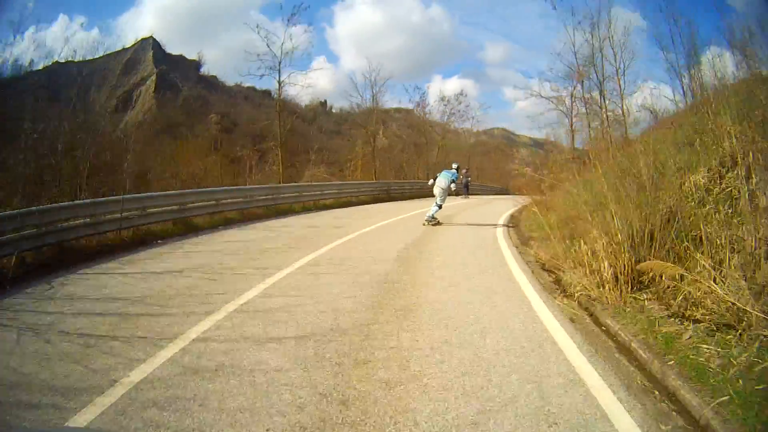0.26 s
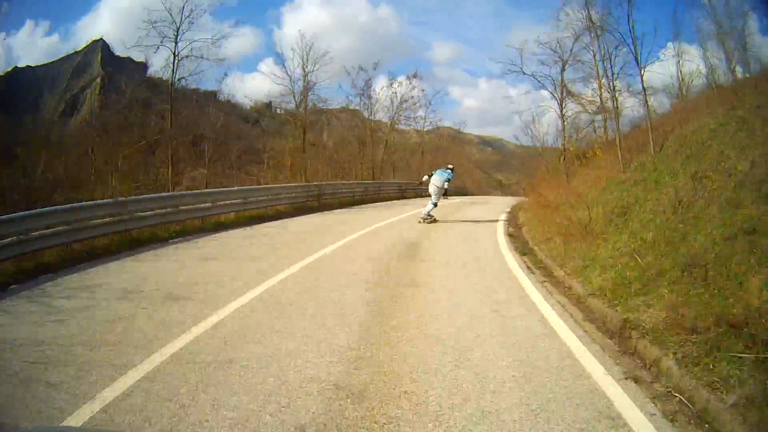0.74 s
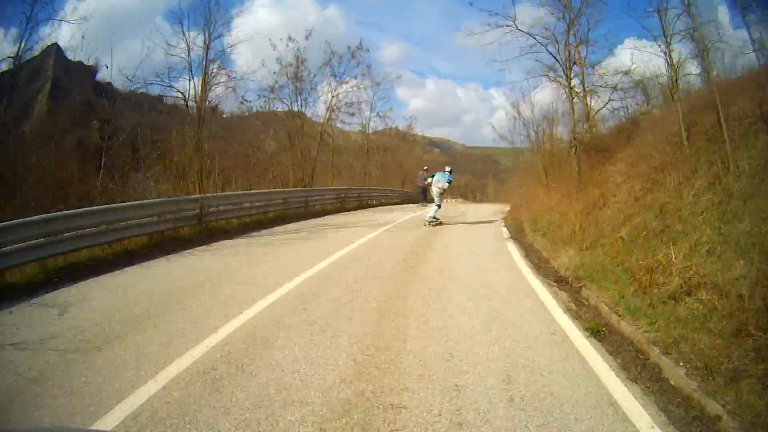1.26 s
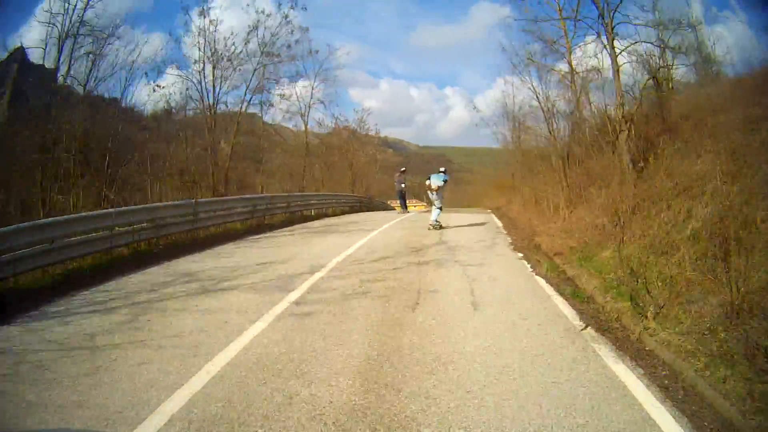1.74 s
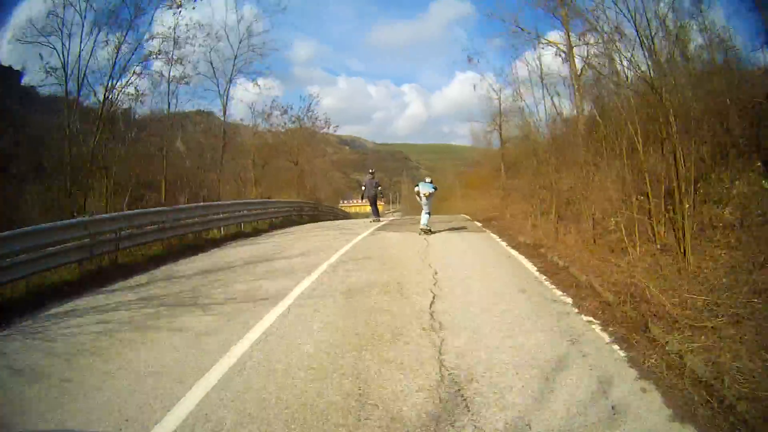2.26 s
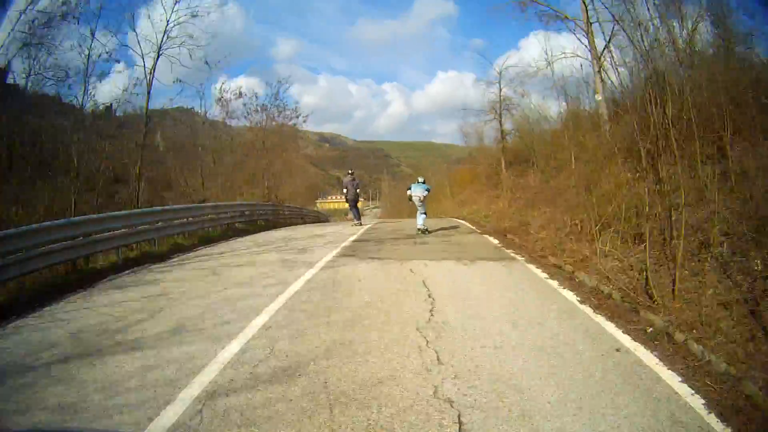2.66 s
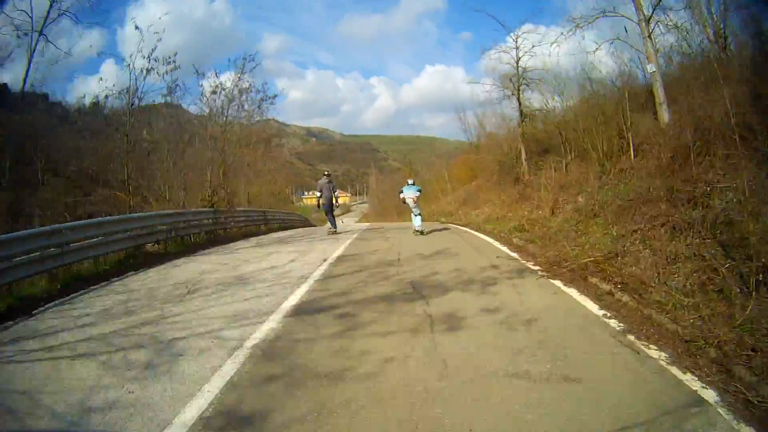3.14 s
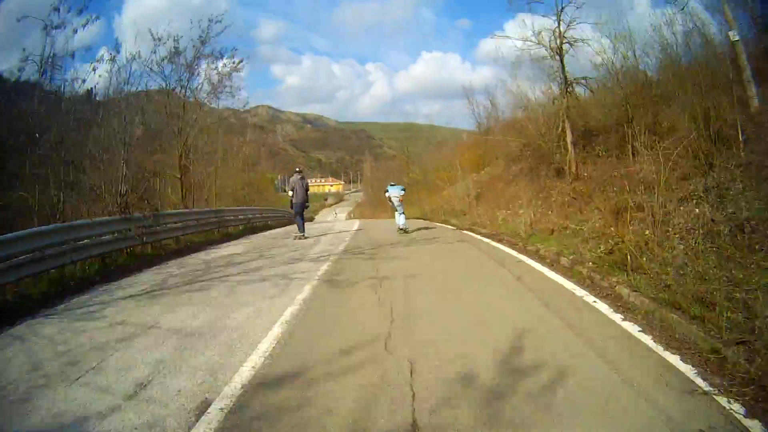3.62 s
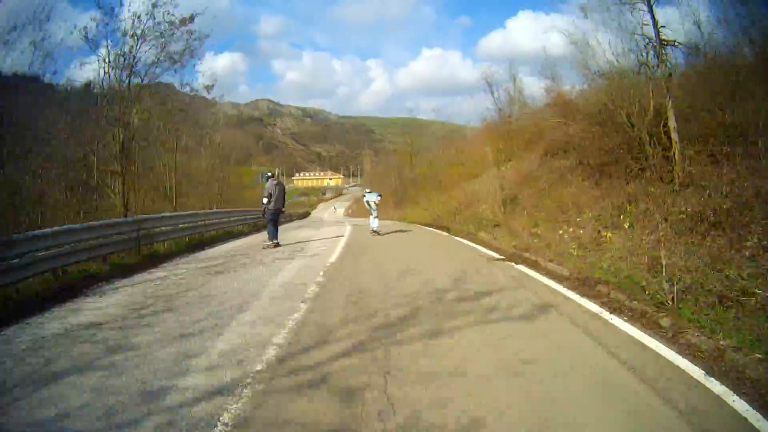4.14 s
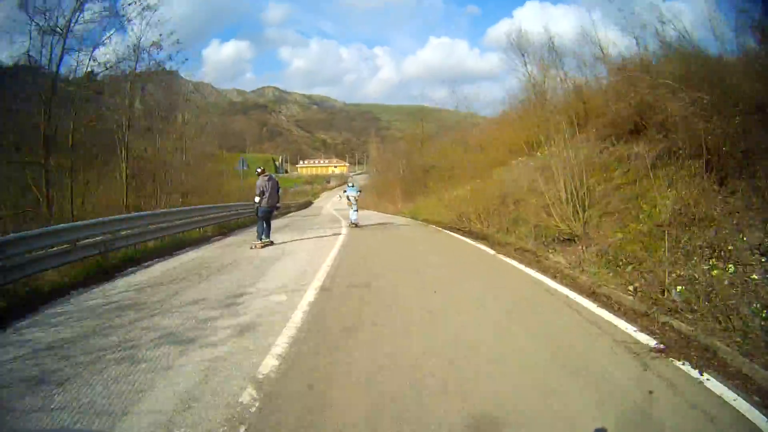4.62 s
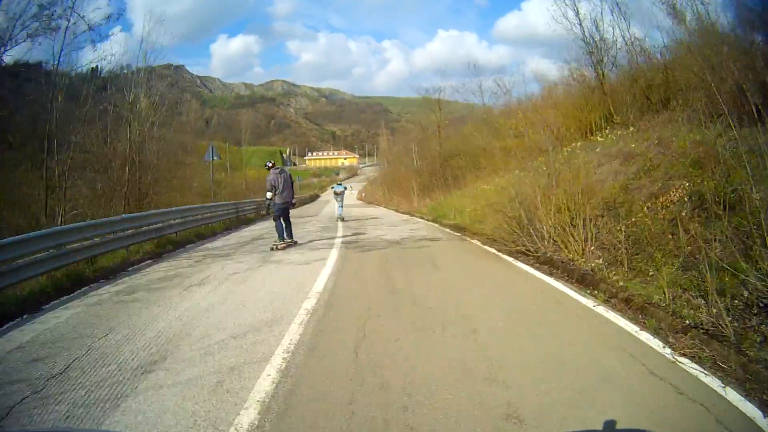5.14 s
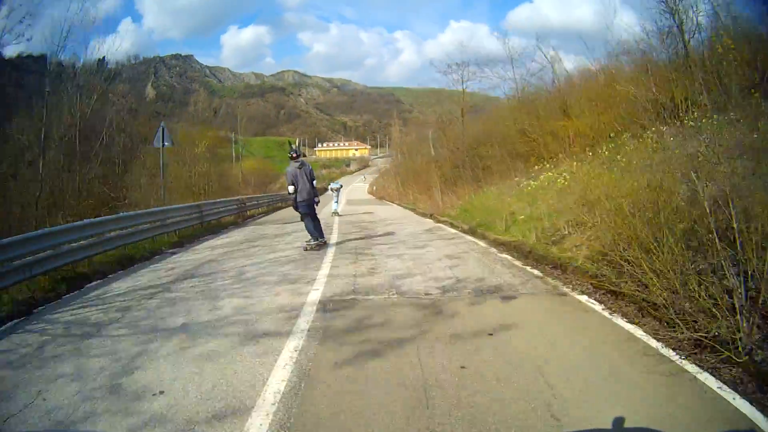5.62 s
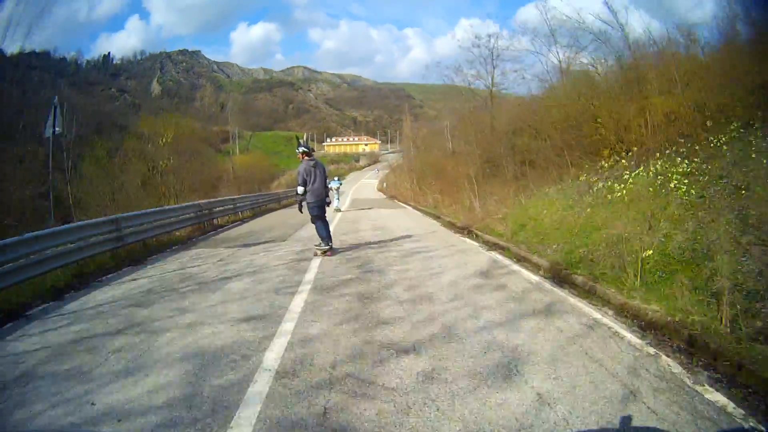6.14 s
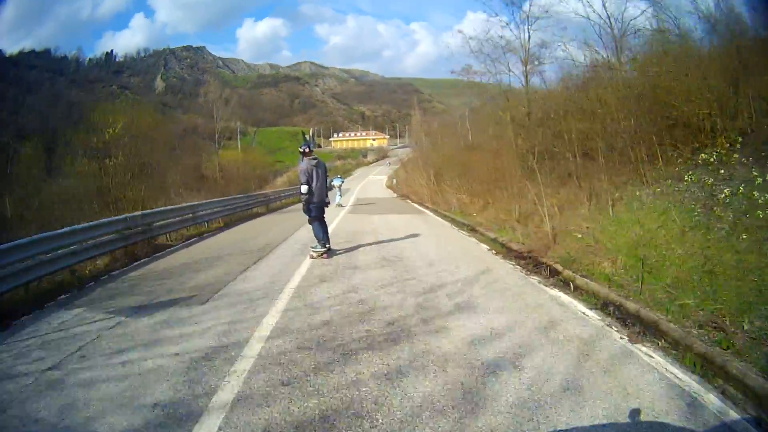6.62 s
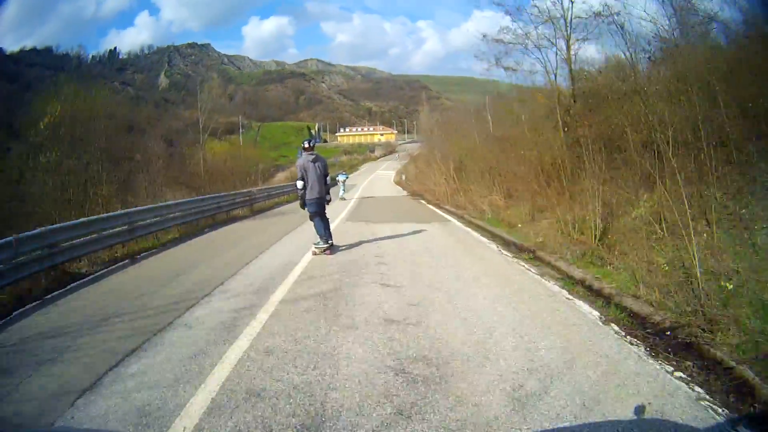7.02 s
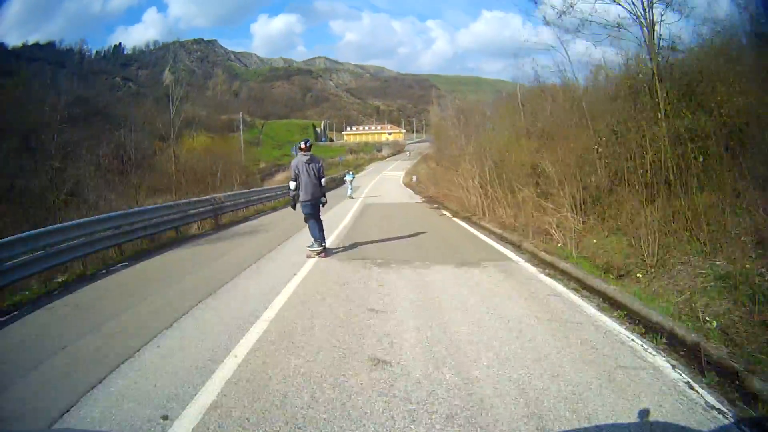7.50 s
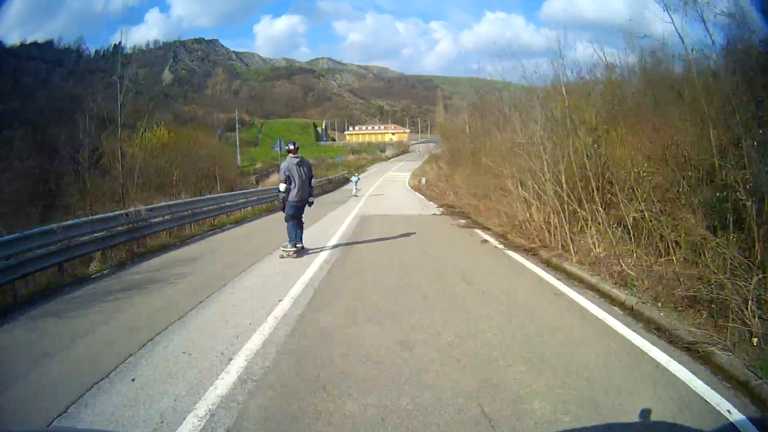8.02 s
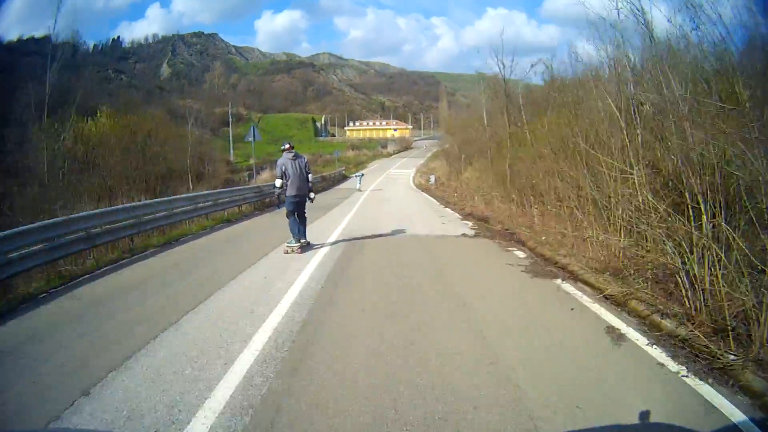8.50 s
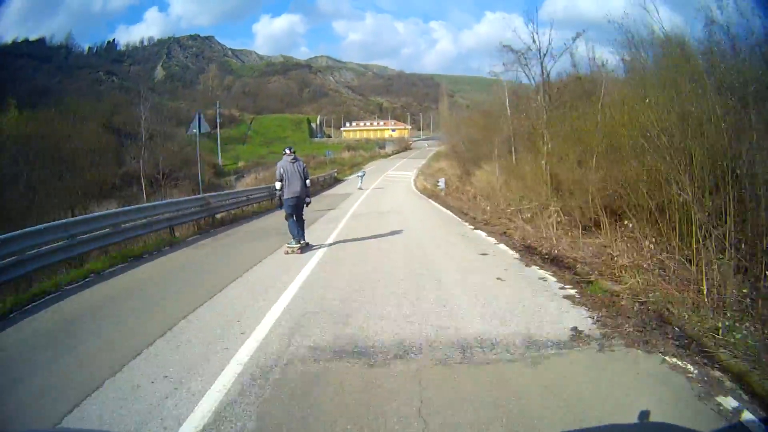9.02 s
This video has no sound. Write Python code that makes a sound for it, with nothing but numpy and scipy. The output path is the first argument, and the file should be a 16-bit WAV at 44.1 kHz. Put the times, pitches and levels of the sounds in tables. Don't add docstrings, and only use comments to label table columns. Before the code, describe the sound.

A continuous low rumble of a longboard speeding downhill, with buzzing body vibration, gritty rattle, dull crack thumps and a few small stone knocks.

```python
import sys
import numpy as np
from scipy import signal
from scipy.fft import rfft, irfft, next_fast_len
from scipy.io import wavfile
from scipy.ndimage import uniform_filter1d, map_coordinates

SR = 44100
rng = np.random.default_rng(int(sys.argv[2]) if len(sys.argv) > 2 else 0)


def to_wav(s):
    ch = np.atleast_2d(s).T
    pcm = np.round(np.clip(ch, -1, 1) * 32767)
    wavfile.write(sys.argv[1], SR, pcm.astype(np.int16))


def voltage_ratio(decibels):
    exponent = np.asarray(decibels, float) / 20
    return 10 ** exponent


N = 408366
HIT_S = np.arange(SR // 5) / SR


def unit(x):
    return x / np.sqrt(np.mean(x ** 2) + 1e-20)


def along(points, hz):
    f, v = np.transpose(points)
    return np.interp(np.log(hz + 1), np.log(f + 1), v)


def wobble(knots_per_s):
    return map_coordinates(rng.standard_normal(N // 100), [np.arange(N) * knots_per_s / SR])


def filtered(x, response):
    m = next_fast_len(N + SR // 2)
    return irfft(rfft(x, m) * response(np.fft.rfftfreq(m, 1 / SR)), m)[..., :N]


def ring(x, modes):
    def response(f):
        total = 0
        for k, (hz, width_hz, db) in enumerate(modes):
            damping = 1j * f * width_hz
            total = total + (-1) ** k * voltage_ratio(db) * damping / (hz * hz - f * f + damping)
        return total
    return filtered(x, response)


def evened(x, size):
    power = np.abs(signal.hilbert(x, next_fast_len(N))[:N]) ** 2
    swell = np.abs(uniform_filter1d(power, size))
    return unit(x / np.sqrt(swell + 1e-3 * power.mean()))


def hits(times_s, shapes):
    out = np.zeros(N + SR)
    for s, shape in zip(times_s, shapes):
        out[round(s * SR):][:len(shape)] += shape
    return out[:N]


def passing(rows, edge=2):
    t = np.arange(0, N + 64, 64) / SR
    change_db = sum(db * np.exp(-np.abs((t - s) / half_s) ** edge) for s, db, half_s in rows)
    return np.interp(np.arange(N) / SR, t, change_db)


# [t/s, unevenness/dB, stone coarseness/dB]
SURFACE = [(0.0, -36, -51), (0.5, -38, -52.5), (0.85, -37.5, -49.5), (1.3, -42, -50), (1.9, -38.5, -51),
           (2.3, -41.5, -54), (2.6, -42.5, -55.5), (3.1, -42.5, -56.4), (3.5, -42, -54.5),
           (3.95, -47.5, -60.5), (4.25, -50.5, -52), (4.6, -49, -55.5), (5.2, -41.5, -56.5),
           (5.6, -45.5, -54.5), (6.4, -40, -55.8), (7.5, -39.5, -54.5), (8.5, -40, -54), (9.26, -47, -57)]


def surface():
    s, uneven_db, coarse_db = np.transpose(SURFACE)
    t = np.arange(N) / SR
    return np.interp(t, s, uneven_db), np.interp(t, s, coarse_db)


def answer(usual_db, per_uneven, per_coarse):
    uneven_db, coarse_db = surface()
    return usual_db + per_uneven * (uneven_db + 43) + per_coarse * (coarse_db + 54)


# [f/Hz, width/Hz, level/dB]
DECK_MODES = [(21.9, 23, -32.5), (44.4, 10.3, -9.5), (54.8, 4.32, 1)]
# [t/s, change/dB, half length/s]
DIPS = [(0.205, 6, 0.04), (0.545, -7.0, 0.13), (0.845, 3, 0.1), (1.095, -10, 0.045), (1.595, 2.0, 0.25),
        (1.875, -11, 0.045), (2.035, 6, 0.063), (2.345, 3.8, 0.063), (2.635, -6, 0.1), (2.965, 5, 0.034),
        (3.515, 5.5, 0.054), (3.785, 6.6, 0.11), (4.295, 4.2, 0.063), (4.625, 0, 0.1), (4.925, -6, 0.07),
        (5.115, 3.5, 0.045), (5.545, -10, 0.078), (6.205, -2.5, 0.21), (6.685, -9, 0.14),
        (6.895, 7.5, 0.034), (7.145, 4.5, 0.07), (7.805, -11, 0.055), (8.005, 3.5, 0.07), (8.165, -7, 0.07),
        (8.365, 5.5, 0.034), (8.465, 2, 0.026), (8.685, 7.5, 0.11), (8.915, 3, 0.07)]


def deck():
    level_db = answer(-47.5, per_uneven=0.49, per_coarse=0.06) + 1.28 * passing(DIPS) + 0.5
    return voltage_ratio(level_db) * evened(ring(rng.standard_normal(N), DECK_MODES), size=3000)


# [f/Hz, width/Hz, level/dB]
AXLE_MODES = [(86.9, 22, -2), (116, 30.1, 2.5)]
# [t/s, change/dB, half length/s]
RIDGES = [(0.395, -3.5, 0.052), (0.525, 4.9, 0.017), (0.935, -5.0, 0.062), (1.045, 4, 0.03),
          (1.335, 4, 0.035), (2.475, 2, 0.026), (2.565, -7, 0.023), (2.645, 5, 0.03), (2.795, -4, 0.056),
          (2.905, 3, 0.019), (3.465, -1, 0.03), (3.545, -5, 0.022), (3.995, -3, 0.046), (4.115, 4, 0.049),
          (4.435, -3.5, 0.036), (4.575, 3.5, 0.05), (4.965, 6.5, 0.015), (5.465, -6, 0.03),
          (5.615, -4.4, 0.042), (5.835, 0.5, 0.21), (6.185, -2.5, 0.057), (6.355, 3.8, 0.02),
          (6.695, -5, 0.024), (7.815, -6, 0.024), (8.395, 6.5, 0.023), (8.505, -5, 0.027),
          (8.635, 2.5, 0.017), (9.155, 2.9, 0.045)]


def axles():
    level_db = surface()[0] - 0.8 + 1.28 * passing(RIDGES)
    bounce = ring(ring(rng.standard_normal(N), AXLE_MODES), [(113, 150, 0)])
    return voltage_ratio(level_db) * evened(bounce, size=3000)


# [f/Hz, width/Hz, level/dB]
CORE_MODES = [(216.4, 24, -8.5), (246.9, 6.3, -1.5), (260.8, 7.4, -6.5)]
# [t/s, change/dB, half length/s]
LEANS = [(0.195, 7.2, 0.18), (0.505, 0.5, 0.1), (0.805, -6, 0.1), (2.895, 8.5, 0.11), (3.345, 6.5, 0.058),
         (3.575, -8.0, 0.12), (3.965, 8.5, 0.09), (4.445, -1, 0.17), (4.845, 4.5, 0.07),
         (5.065, -19, 0.092), (5.665, 5, 0.1), (5.975, 5.5, 0.061), (6.985, -1, 0.045), (8.195, -6, 0.31),
         (8.595, -4, 0.15), (9.035, 5.5, 0.21)]


def wheel_cores():
    level_db = answer(-60.5, per_uneven=0.82, per_coarse=1)
    level_db = level_db + 0.15 * passing(RIDGES) + 0.92 * passing(LEANS) + 1.8 * wobble(9)
    drum = ring(ring(rng.standard_normal(N), CORE_MODES), [(242, 120, 0)])
    return voltage_ratio(level_db) * evened(drum, size=5000)


# [f/Hz, width/Hz, level/dB]
PANEL_MODES = [(302.5, 19.4, 0), (316.3, 20, 0.5), (357.2, 6.4, 1), (382.6, 15.3, -2), (489.3, 33, -3),
               (528, 23.5, -2.5), (587, 44, -1.5), (706, 81, -14)]
# [t/s, change/dB, half length/s]
PATCHES = [(0.235, -2, 0.023), (0.345, 3.5, 0.043), (0.565, 2, 0.036), (0.665, -3.2, 0.022),
           (0.805, -3.5, 0.053), (0.945, 2.5, 0.049), (1.045, 1.3, 0.029), (1.185, 2, 0.074),
           (1.335, -2.5, 0.059), (1.585, -1.5, 0.14), (1.775, 1.5, 0.1), (2.115, 2, 0.16),
           (2.435, 3, 0.015), (2.585, -2, 0.028), (2.695, 2.3, 0.025), (2.815, 2.5, 0.066),
           (3.035, -1.5, 0.13), (3.205, 2, 0.037), (4.025, 2.2, 0.035), (4.445, -1.8, 0.07),
           (5.985, 2.5, 0.03), (6.855, 1.5, 0.07), (7.055, -2.5, 0.039), (7.175, -2, 0.19),
           (7.515, 1.5, 0.085), (8.335, 0.6, 0.1), (8.525, -2.6, 0.08), (9.035, 2, 0.11)]


def panels():
    level_db = answer(-56, per_uneven=0.25, per_coarse=0.5)
    level_db = level_db + 0.17 * passing(LEANS) + 0.18 * passing(PATCHES) + 0.75 * wobble(11)
    body = ring(ring(rng.standard_normal(N), PANEL_MODES), [(476, 640, 0)])
    return voltage_ratio(level_db) * evened(body, size=4000)


# [f/Hz, width/Hz, change/dB]
MOUNT_BANDS = [(14, 10, -10), (71, 7.1, -15), (159.2, 5.5, 3), (193, 13, 2.5), (213, 9.1, -14),
               (288, 12.2, -7), (341.5, 3.7, 1), (373, 4.6, -10.5), (428, 17, -1.5), (667, 39.4, -7),
               (926, 67, -22), (1000, 35, 6)]


def rumble():
    shake = deck() + axles() + wheel_cores() + panels()

    def mount(f):
        return voltage_ratio(sum(db * np.exp(-((f - hz) / width_hz) ** 2) for hz, width_hz, db in MOUNT_BANDS))
    return filtered(shake, mount)


# [f/Hz, width/Hz, level/dB]
SHELL_MODES = [(820, 324, -13.5), (1176, 79, -8), (1473, 176, -5.5), (1735, 234, 0), (2430, 955, -3.5),
               (3164, 240, -0.5), (3645, 300, -3), (4253, 280, -1.5), (4970, 355, 5), (5330, 490, 1.5),
               (6120, 640, -3.5), (7380, 1570, -11.5)]
# [f/Hz, level/dB]
SHELL_SKIRT = [(500, 3), (1000, 4.5), (1500, 0.5), (5500, -1.5), (7500, -8), (9200, 4.5), (10200, -12),
               (11000, -30), (16000, -45)]


def shell_rattle():
    level_db = surface()[1] + 0.1 + passing(PATCHES, edge=7.6) + 0.31 * wobble(14)
    contacts = (rng.random(N) < 0.04) * rng.standard_normal(N)
    texture = voltage_ratio(0.63 * wobble(30) + 0.83 * wobble(70) + 0.6 * wobble(160))
    drive = texture * (rng.standard_normal(N) + 0.34 * unit(contacts))
    rattle = filtered(ring(drive, SHELL_MODES), lambda f: voltage_ratio(along(SHELL_SKIRT, f)))
    return voltage_ratio(level_db) * evened(rattle, size=4000) + small_part(drive)


# [t/s, change/dB, half length/s]
FLECKS = [(0.085, -10, 0.04), (0.445, -10, 0.07), (0.915, 4.6, 0.04), (1.025, 12, 0.012), (1.225, 7, 0.044),
          (1.545, -5, 0.1), (1.775, 7, 0.045), (1.915, -13.5, 0.076), (2.125, 14, 0.022), (2.335, 8, 0.025),
          (3.185, 11, 0.025), (3.725, 5.8, 0.014), (4.235, 10, 0.076), (4.895, -2.9, 0.12),
          (6.175, 9, 0.04), (6.405, 8, 0.015), (6.505, 7, 0.1), (7.455, 3.6, 0.04), (7.615, 8, 0.025),
          (8.015, 8, 0.04)]


def small_part(drive):
    level_db = answer(-79, per_uneven=-0.08, per_coarse=0.47)
    level_db = level_db + 0.92 * passing(FLECKS) + 3.2 * wobble(90) + 0.89 * wobble(30)
    return voltage_ratio(level_db) * unit(ring(ring(drive, [(9720, 350, 0)]), [(9400, 2000, 0)]))


# [t/s, peak level/dB, f/Hz, t60/s]
CRACKS = [(0.515, -40, 120, 0.037), (0.845, -21, 110, 0.055), (1.549, -43, 110, 0.049),
          (1.999, -20, 106, 0.077), (2.454, -28, 119, 0.15), (3.252, -24.5, 116, 0.12),
          (3.453, -24, 116, 0.11), (4.949, -42, 120, 0.042), (6.437, -29, 117, 0.091),
          (6.678, -24.5, 108, 0.28), (7.184, -26, 106, 0.15), (7.408, -21, 106, 0.091),
          (7.662, -20.5, 115, 0.064), (8.375, -40, 96.9, 0.051), (8.624, -18, 102, 0.04)]


def crack_thumps():
    rise = 1 - np.exp(-HIT_S / 0.0093)
    thumps = [voltage_ratio(db - 60 * HIT_S / t60) * np.sin(2 * np.pi * hz * HIT_S) * rise
              for _, db, hz, t60 in CRACKS]
    return hits([row[0] for row in CRACKS], thumps)


def puff(db, t60_s):
    rise = 1 - np.exp(-HIT_S / 0.0015)
    return voltage_ratio(db - 60 * HIT_S / t60_s) * rise * rng.standard_normal(len(HIT_S))


# [t/s, peak level/dB, f/Hz, t60/s]
STONES = [
    (2.053, -41, 2900, .016),
    (2.4362, -37, 1950, .016),
    (2.4395, -42, 1500, .022),
]


def stone_knocks():
    times_s = [row[0] for row in STONES]
    tones = []
    for _, db, hz, t60 in STONES:
        partials = np.sin(2 * np.pi * hz * HIT_S) + 0.29 * np.sin(2 * np.pi * 1.9 * hz * HIT_S)
        tones.append(voltage_ratio(db - 60 * HIT_S / t60) * partials)
    contact = hits(times_s, [puff(row[1], t60_s=0.008) for row in STONES])
    return hits(times_s, tones) + ring(ring(contact, [(2800, 2500, 0)]), [(2800, 3000, 0)])


# [t/s, peak level/dB]
TICKS = [(.5646, -54), (.7357, -53), (.8884, -50), (1.1548, -56), (1.3977, -56), (1.702, -54), (1.936, -59),
         (2.0722, -54), (2.3444, -52), (3.0345, -57), (3.7239, -54), (5.6925, -58), (6.3375, -55),
         (6.4433, -58), (6.6997, -56), (7.6086, -54), (8.6223, -57)]


def grit_ticks():
    ticks = hits([row[0] for row in TICKS], [puff(db, t60_s=0.035) for _, db in TICKS])
    chip = hits([1.0235], [puff(-46, t60_s=0.04)])
    chip_tone = [(6000, -30), (8500, 0), (11000, -4), (15000, -5)]  # f/Hz, level/dB
    chip = filtered(chip, lambda f: voltage_ratio(along(chip_tone, f)))
    return ring(ring(ticks, [(8500, 5000, 0)]), [(8500, 6000, 0)]) + chip


def ports(x, zero_hz, zero_q, pole_hz, pole_q, low_db):
    def pair(f, hz, q):
        return 1 - (f / hz) ** 2 + 1j * f / hz / q

    def response(f):
        log_ratio = np.log(pair(f, zero_hz, zero_q)) - np.log(pair(f, pole_hz, pole_q))
        half = np.exp(0.5 * log_ratio)
        return np.array([voltage_ratio(low_db / 2) * half, voltage_ratio(-low_db / 2) / half])
    return filtered(x, response)


def scene():
    shake = rumble() + shell_rattle() + crack_thumps() + stone_knocks() + grit_ticks()
    return ports(shake, zero_hz=320, zero_q=0.42, pole_hz=581, pole_q=0.98, low_db=-4.5)


# [f/Hz, level/dB]
HISS = [(20, 43), (60, 18), (150, -11), (300, 6), (700, 11.5), (2000, 4.5), (5000, -1), (10000, 1.5),
        (14900, -1.5)]


def mic_hiss():
    noise = filtered(rng.standard_normal((2, N)), lambda f: voltage_ratio(along(HISS, f)))
    return voltage_ratio([[-112], [-111]]) * np.sqrt(SR / 2) * noise


# [f/Hz, rms level/dB]
WHINE = [(12600, -103), (13151, -99)]


def whine():
    t = np.arange(N) / SR
    tones = sum(np.sqrt(2) * voltage_ratio(db) * np.sin(2 * np.pi * hz * t) for hz, db in WHINE)
    return [[0], [1]] * tones


# [from t/s, top f/Hz]
TREBLE_TOP = [(0, 15000), (2.65, 13500), (2.95, 14250), (3.03, 15000), (3.25, 14250), (3.6, 15000),
              (3.7, 13500), (3.8, 14250), (4.8, 15000), (4.96, 14250), (5.42, 13500), (5.5, 14250),
              (5.68, 13500), (5.76, 15000), (6.33, 14250), (7.36, 13500), (8.37, 15000), (8.41, 13500),
              (8.6, 15000), (8.85, 14250), (9.14, 15000)]


def thinned(x):
    hz, t, z = signal.stft(x, SR, nperseg=1024)
    patch = rng.standard_normal(z.shape[1:])
    for axis in (0, 1):
        patch = uniform_filter1d(patch, size=4, axis=axis)
    depth_db = along([(7000, 0), (9000, 5), (11000, 11), (15000, 12)], hz)[:, None]
    treble = np.abs(z[:, hz > 10500]).mean((0, 1))
    depth_db = depth_db * (treble < 1.6 * np.median(treble))
    start_s, top_hz = np.transpose(TREBLE_TOP)
    spare_hz = 750 * np.repeat(rng.random(len(t)) < 0.2, 3)[:len(t)]
    kept = hz[:, None] < top_hz[np.searchsorted(start_s, t, "right") - 1] + spare_hz
    holes = voltage_ratio(depth_db * np.minimum(unit(patch), 0))
    return signal.istft(z * kept * holes, SR, nperseg=1024)[1][:, :N]


def low_pass(x):
    return signal.sosfilt(signal.butter(12, 15400, fs=SR, output="sos"), x)


def record(dry):
    heard = thinned(dry + mic_hiss() + whine())
    mix = filtered(heard, lambda f: f < 15000) + [[0.0338], [-0.0199]]
    return low_pass(mix)


dry = scene()
out = record(dry)
to_wav(out)
```